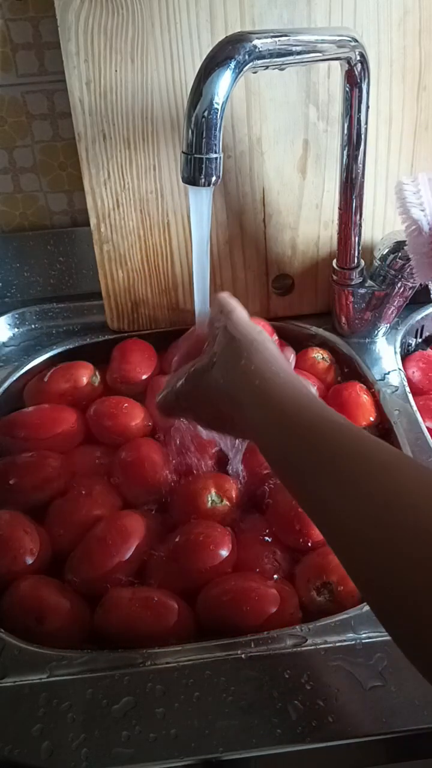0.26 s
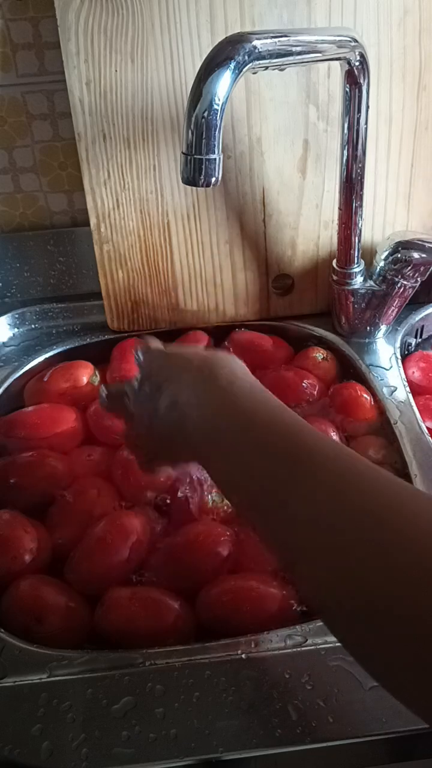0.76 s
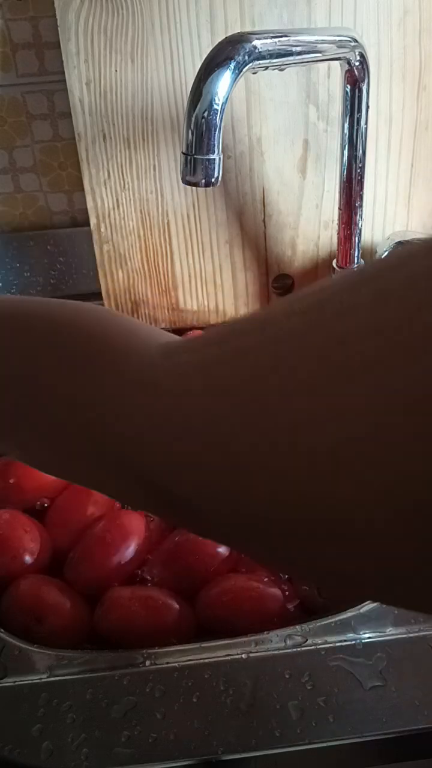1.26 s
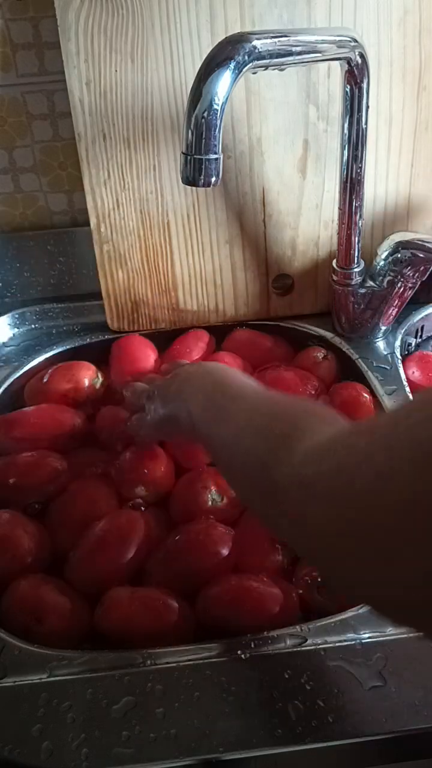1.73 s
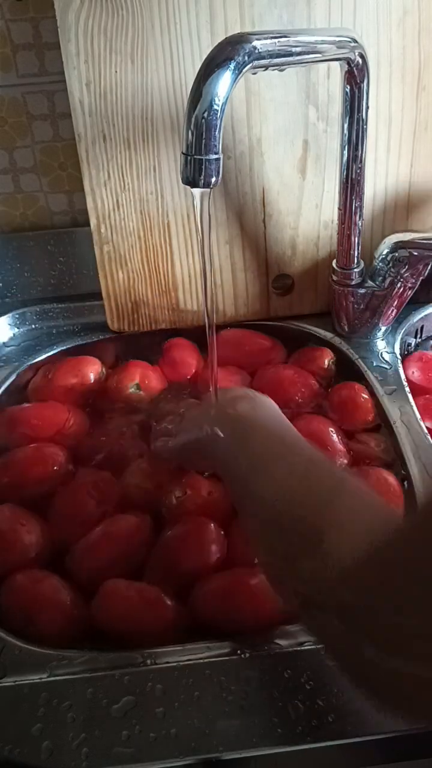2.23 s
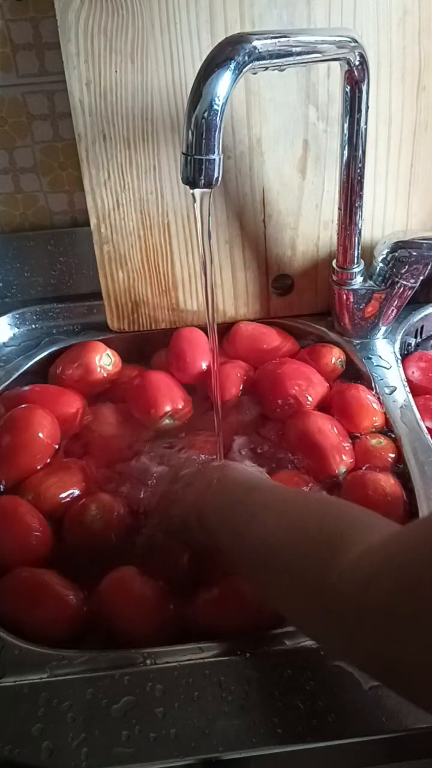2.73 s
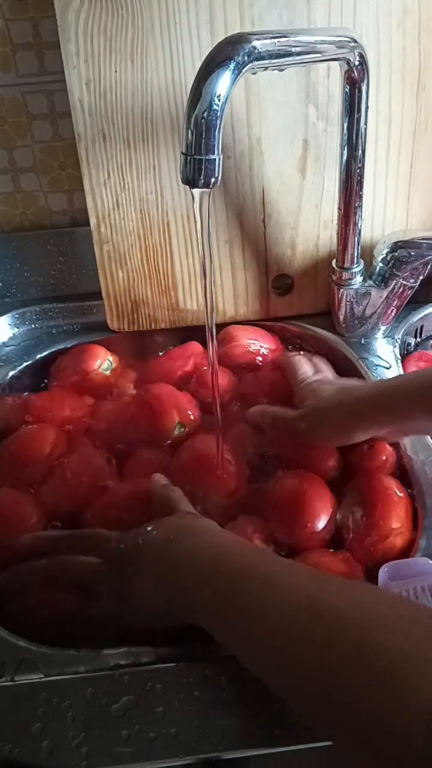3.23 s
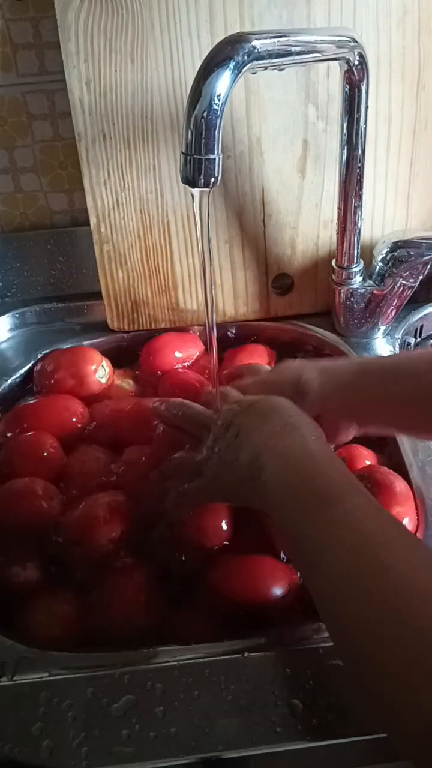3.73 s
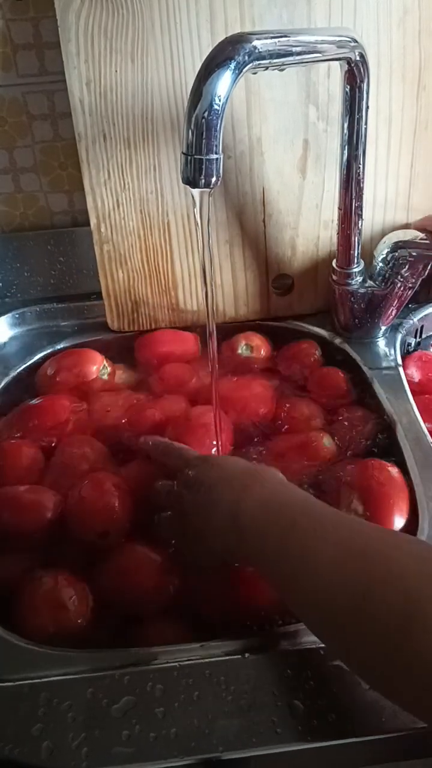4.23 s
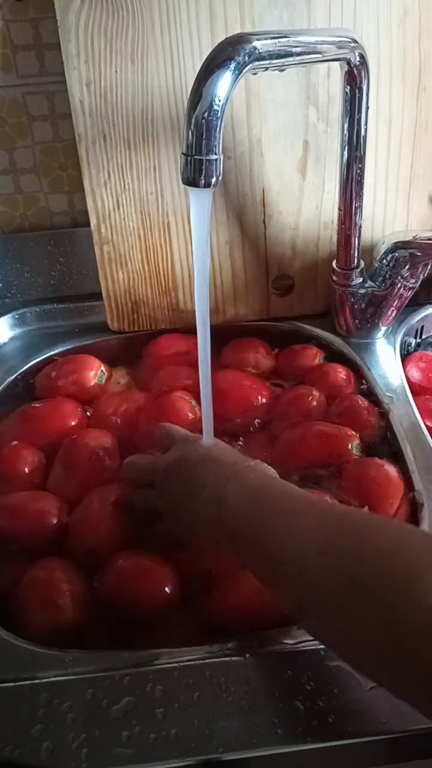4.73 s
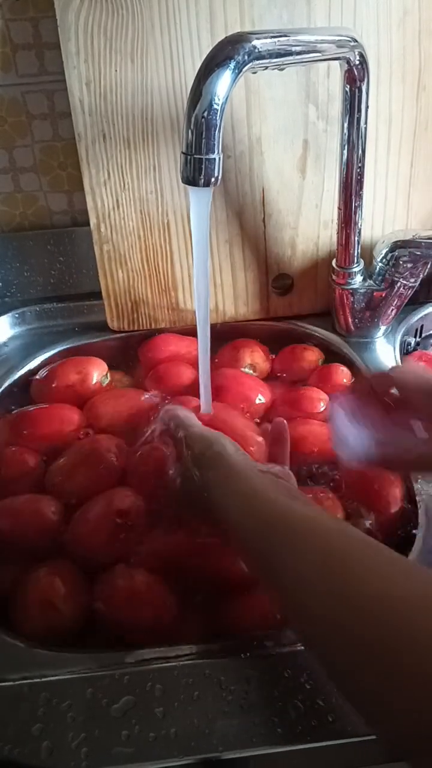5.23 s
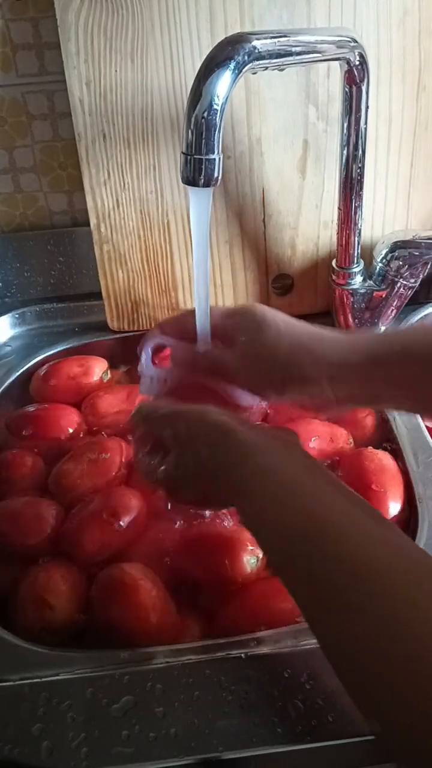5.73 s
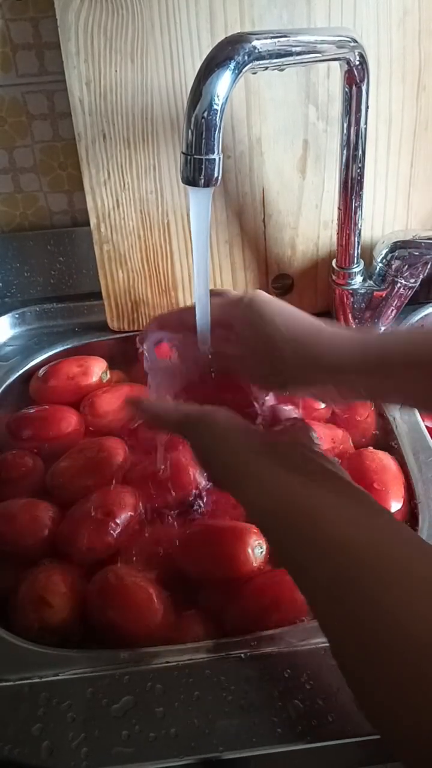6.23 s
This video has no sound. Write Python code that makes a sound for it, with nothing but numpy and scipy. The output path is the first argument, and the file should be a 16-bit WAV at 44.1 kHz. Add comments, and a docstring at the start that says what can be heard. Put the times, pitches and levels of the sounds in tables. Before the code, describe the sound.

Hands wash tomatoes in a steel sink: water stops, something clatters down heavily, then trickle, splashes, dull thuds and a hissing stream.

```python
"""In a tiled kitchen, hands wash tomatoes in a full steel sink under a tap that is shut and opened again.
Shaped noise and tiny bubbles make the stream and the valve's hiss; ringing bubbles make plops and glugs;
noise bursts make spray, drops and slaps. Fruit knocks on the steel, the cabinet booms at its resonance,
a load dumped nearby drives the draining board, and a small metal thing clinks in thin modes.
Decaying noise gives the echoes, and two small microphones colour the whole."""
import sys
import numpy as np
from scipy import signal
from scipy.io import wavfile
from scipy.ndimage import uniform_filter1d

SR = 44100
rng = np.random.default_rng(int(sys.argv[2]) if len(sys.argv) > 2 else 0)


def to_wav(s):
    """Save 16-bit WAV."""
    ch = np.atleast_2d(s).T  # columns
    pcm = np.round(np.clip(ch, -1, 1) * 32767)  # PCM
    wavfile.write(sys.argv[1], SR, pcm.astype(np.int16))


N = 285319

# strength of the running water: (time [s], fizz level [dB], low wash level [dB])
FLOW = [(0, -50.5, -64), (.65, -58.5, -66), (.86, -66.5, -68.5), (.92, -75, -75.5), (1.19, -80.5, -76.5),
        (1.23, -66.5, -56), (1.9, -73.5, -58.5), (2.1, -64.5, -62), (2.6, -67, -61.5), (3.2, -54, -58.5),
        (3.5, -65.5, -65), (4.1, -55.5, -62), (4.52, -69.5, -66), (4.59, -61, -65), (5.2, -56.5, -64.5),
        (5.7, -51, -63), (6.47, -53, -64)]
# resonances of the draining board: (frequency [Hz], width [Hz], relative level [dB])
BOARD = [(200, 21, -13.5), (217, 21, -4), (454, 31, -11.5), (570, 21, 2.5), (757, 54, -1.5),
         (878, 50, -5.5), (1096, 74, 0), (2300, 1660, -13)]
# response of the microphones: (frequency [Hz], gain [dB])
MIC = [(30, -1), (80, -2), (4300, 1), (5300, -7.5), (6500, -8), (7500, -2.5), (8500, -10), (9400, -7.5),
       (10500, -13), (15500, -9)]
SPATTER_S = 0.018  # decay time of the spatter after plops and glugs


def gain_of(db):
    """Level law: decibels become an amplitude factor."""
    return 10 ** (np.asarray(db) / 20)


def evened(x):
    """Power normalization: scales to rms 1."""
    return x / np.sqrt(np.mean(x ** 2) + 1e-20)


def read(points, hz):
    """Spectral interpolation: looks a curve up on a log-frequency axis."""
    f, value = np.transpose(points)
    return np.interp(np.log(hz + 1), np.log(f + 1), value)


def follow(rows, column=1):
    """Linear interpolation in time: one column of a curve at every sample."""
    return np.interp(np.arange(N) / SR, np.transpose(rows)[0], np.transpose(rows)[column])


def add(mix, s, sound, pan_db=0.):
    """Superposition at two microphones; the left one hears the sound two samples later."""
    start = round(s * SR)
    for side, at, db in ((0, start + 2, pan_db / 2), (1, start, -pan_db / 2)):
        wave = np.atleast_2d(sound)[-side]  # a single channel serves both sides
        part = mix[side, at:][:len(wave)]
        part += gain_of(db) * wave[:len(part)]


def resonate(x, hz, width):
    """Damped resonator: one complex pole, whose radius sets the width; gain 1."""
    r = np.exp(-np.pi * width / SR)
    return 2 * signal.lfilter([1 - r], [1, -r * np.exp(2j * np.pi * hz / SR)], x).real


def high(x, hz):
    """High-pass filtering: takes out the bass."""
    return signal.sosfilt(signal.butter(4, hz, "high", fs=SR, output="sos"), x)


def diffuse(length, size, level_db):
    """Diffuse field: noise shaped in frequency and time, with partial likeness between the channels."""
    # (frequency [Hz], left-right likeness [-1 to 1])
    likeness = [(180, 0.95), (550, 0.49), (1650, -0.17), (4970, 0.03), (15000, 0.25)]
    frames, hz = 4 * length // size + 5, np.fft.rfftfreq(size, 1 / SR)[:, None]
    a, b, c, d = rng.standard_normal((frames, len(hz), 4)).T
    same, left = np.clip(read(likeness, hz), -1, 1), a + 1j * b
    right = same * left + np.sqrt(1 - same ** 2) * (c + 1j * d)
    z = np.array([left, right])
    z = z * gain_of(level_db(hz, np.arange(frames) * size / 4 / SR))
    noise = signal.istft(z, nperseg=size, noverlap=size * 3 // 4)[1]
    return evened(noise[:, :length])


def bubble(hz, cycles, rise):
    """Bubble resonance: a decaying sine whose pitch climbs as the bubble nears the surface."""
    turns = np.arange(round(SR * 80 / hz)) * hz / SR
    tone = np.sin(2 * np.pi * turns * (1 + rise * turns))
    return tone * np.exp(-turns / cycles) * np.minimum(turns / 3.2, 1)


def puff(hz, width, length, rise):
    """Band-limited noise burst: fast rise, exponential decay, independent at each microphone."""
    t = np.arange(6000) / SR
    noise = resonate(resonate(rng.standard_normal((2, len(t))), hz, width), hz, width)
    return evened(noise) * np.exp(-t / length) * np.minimum(t / rise, 1)


def ring(modes):
    """Modal superposition: all modes (Hz, dB, t60 in s) are struck at once, then scaled to peak 1."""
    t = np.arange(round(.4 * SR)) / SR
    out = sum(gain_of(db - 60 * t / t60) * np.sin(2 * np.pi * hz * t) for hz, db, t60 in modes)
    return out / abs(out).max()


def swell(db, hz, length):
    """Modulated low resonance: an uneven tone swells and fades while its pitch sags."""
    wobble, sag_per_s = 0.39, 0.37  # share of unevenness; phase sag, so the pitch falls twice as fast
    t = np.arange(round(length * SR)) / SR
    slow = evened(uniform_filter1d(rng.standard_normal(SR // 2), size=900))
    uneven = 1 + wobble * slow[:len(t)]
    tone = np.sin(2 * np.pi * hz * t * (1 - sag_per_s * t))
    return gain_of(db) * uneven * tone * signal.windows.tukey(len(t), .6)


def stream():
    """Turbulence and bubble noise: patchy hiss and countless tiny bubbles over a low wash."""
    # spectra of fizz and low wash: (frequency [Hz], relative density [dB per Hz])
    fizz_colour = [(410, -48), (700, -16), (1620, -9.5), (2630, -2.5), (4050, 1), (5400, -16.5),
                   (7290, -7.5), (10500, -21.5), (16000, -23)]
    wash_colour = [(38, -19), (173, 2), (422, -2), (637, -7.5), (810, -8.5), (1950, -14), (3300, -120)]

    def patchy(hz, t):
        """Random modulation: the fizz colour with drifting patches."""
        luck = rng.standard_normal((len(t), len(hz))).T
        flicker = evened(uniform_filter1d(luck[0], size=5))  # all frequencies together
        patches = uniform_filter1d(uniform_filter1d(luck, size=8, axis=0), size=24, axis=1)
        return read(fizz_colour, hz) - read(MIC, hz) + 1.9 * flicker + 2.4 * evened(patches)

    hiss = diffuse(N, size=512, level_db=patchy)
    tiny = np.zeros((2, N))
    for hz in np.geomspace(1800, 9000, num=16):
        sizes = gain_of(2.3 * np.minimum(rng.exponential(1, (2, N)), 5))
        drops = sizes * (rng.random((2, N)) < 40 / SR)  # 40 per second on average
        notes = signal.oaconvolve(drops, bubble(hz, 8.9, 0.0061)[None])[:, :N]
        tiny += gain_of(read(fizz_colour, hz) - read(MIC, hz)) * notes
    wash = diffuse(N, size=2048, level_db=lambda hz, t: read(wash_colour, hz) + 0 * t)
    fizz = hiss + gain_of(-8.0) * evened(tiny)
    return gain_of(follow(FLOW)) * fizz + gain_of(follow(FLOW, column=2)) * wash


def valve():
    """Constriction noise: treble hiss with fuzzy whistles, clearer as the valve narrows."""
    # open, shut, opened to a trickle, then wide: (time [s], hiss level [dB])
    opening = [(0, -59), (.45, -56), (.92, -105), (1.9, -99), (2.1, -66.5), (4.53, -65.5), (4.59, -60),
               (5.7, -51.5)]
    # (frequency [Hz], width [Hz], relative strength [dB])
    whistles = [(5616.1, 67, 7), (7230, 140, 2.5), (9116.7, 280, 3), (13700, 100, -6.5)]
    pinch_db_per_db, pinch_most_db = 0.5, 7

    def colour(hz, t):
        """Resonant peaks on a noise floor: a treble plateau with narrow humps."""
        s, level_db = np.transpose(opening)
        drop_db = level_db.max() - np.interp(t, s, level_db)
        pinch_db = np.minimum(pinch_db_per_db * drop_db, pinch_most_db)
        humps = sum(gain_of(2 * (db + pinch_db)) * 30 / (1 + (2 * (hz - f) / w) ** 2)
                    for f, w, db in whistles)  # powers
        plateau = 1 + (6000 / (hz + 1)) ** 4
        return 10 * np.log10((1 + humps) / plateau) - 0.64 * read(MIC, hz)

    return gain_of(follow(opening)) * diffuse(N, size=1024, level_db=colour)


def cabinet():
    """Cavity resonance: low booms of the cabinet, from pushing hands and the dumped load, over a faint hum."""
    # booms from pushing hands and the dumped load: (time [s], level [dB], length [s])
    booms = [(0.439, -39.5, 0.15), (1.249, -44.5, 0.11), (1.368, -28, 0.055), (1.784, -50, 0.11),
             (1.974, -45.5, 0.075), (2.16, -44.5, 0.073), (2.648, -40.5, 0.15), (3.186, -54, 0.23),
             (3.962, -51, 0.086), (4.299, -54.5, 0.14)]
    cabinet_hz, hum_over_wash_db = 93.6, -7  # the water keeps the hollow faintly alive
    shudder_db, shudder_s = -13.5, 0.16  # rumble relative to the boom, and its decay time
    out, clock = np.zeros((2, N)), np.arange(N) / SR
    level = gain_of(follow(FLOW, column=2) + hum_over_wash_db)
    for s, db, length in booms:
        add(out, s, swell(db, cabinet_hz, length))
        age = clock - s
        shudder = np.exp(-abs(age) / shudder_s) * np.clip(age / length, 0, 1)
        level = level + gain_of(db + shudder_db) * shudder
    rumble = resonate(resonate(rng.standard_normal(N), cabinet_hz, 36), cabinet_hz, 36)
    return out + level * evened(rumble)


def plop(mix, s, db, hz):
    """Bubble entrainment: a main bubble rings, eight smaller sounds tumble after it, spatter flies."""
    spatter_db, spatter_width = -8, 0.68  # relative level; width as a share of the pitch
    main = bubble(hz, 2.8, 0.0041)
    add(mix, s, gain_of(db) * main / abs(main).max(), 8.0 * (rng.random() - .5))
    for late, size, soft, side in rng.random((8, 4)):
        small = bubble(hz * (0.76 + 1.096 * size), 4.3, 0.0069)
        small_db = db - 2.5 - 9.0 * late - 5.2 * soft
        add(mix, s + 0.041 * late, gain_of(small_db) * small, 3.3 * (side - .5))
    add(mix, s, gain_of(db + spatter_db) * puff(hz, spatter_width * hz, SPATTER_S, 0.0032))


def plops(mix):
    """Bubble resonance: clear plops at set times, small ones by chance as loud as the flow allows."""
    # (time [s], level [dB], pitch [Hz])
    clear = [(0.247, -39, 2120), (0.353, -37.5, 3260), (0.37, -42.5, 1790), (0.418, -37, 1850),
             (0.509, -36.5, 3230), (1.952, -38, 1394), (2.412, -39, 2060), (2.428, -40.5, 2530),
             (2.48, -35.5, 2026), (2.503, -34, 2190), (2.525, -32.5, 1820), (2.534, -30.5, 3430),
             (2.948, -36.5, 3500), (3.162, -32.5, 2800), (3.187, -30, 1544), (3.229, -27, 2190),
             (3.259, -29, 1404), (3.29, -32.5, 4540), (3.318, -33.5, 1680), (3.623, -32.5, 3800),
             (3.646, -32, 3520), (3.828, -48, 3470), (3.874, -48, 1520), (4.068, -46, 3393),
             (4.156, -35, 1486), (5.107, -42.5, 3700), (5.145, -33, 4100), (5.24, -44.5, 3030),
             (5.255, -45.5, 1690), (5.474, -37, 2870), (5.636, -37, 3280), (5.961, -36, 4840),
             (6.159, -36, 2230)]
    per_s, over_fizz_db, spread_db = 3, 9, 7  # chance plops lie up to the spread lower
    low_hz, octaves = 1506, 1.32
    for s, db, hz in clear:
        plop(mix, s, db, hz)
    fizz_db = follow(FLOW)
    for when, small, pitch in rng.random((round(per_s * N / SR), 3)):
        db = fizz_db[int(when * N)] + over_fizz_db - spread_db * small
        plop(mix, when * N / SR, db, low_hz * 2 ** (octaves * pitch))


def ticks(mix):
    """Impact noise: single drops land by chance in short wide-band bursts."""
    per_s, over_fizz_db, spread_db, tick_s = 14, 7.5, 2, 0.0012
    fizz_db = follow(FLOW)
    for when in rng.random(round(per_s * N / SR)):
        extra_db = spread_db * min(rng.exponential(1), 3)
        db = fizz_db[int(when * N)] + over_fizz_db + extra_db
        add(mix, when * N / SR, gain_of(db) * puff(5600, 9000, tick_s, 0.00008))


def spits(mix):
    """Spray noise: fine droplets hiss in a band above a lowest pitch."""
    # (time [s], level [dB], reach above the lowest pitch, before its limits [octaves])
    sprays = [(0.7394, -45.5, 1.15), (0.822, -52.5, 1.5), (1.936, -41.5, 1.555), (2.528, -41, 0.79),
              (2.566, -42.5, 1.1), (2.972, -20.5, 0.64), (3.144, -36, 0.77), (3.2314, -37.5, 1),
              (3.366, -45.5, 0.6622), (3.69, -46, 1.52), (3.874, -48, 1.4), (3.915, -44, 0.39),
              (4.031, -44, 0.98), (5.038, -41, 0.76), (5.47, -46.5, 0.6), (5.552, -40, 0.53),
              (5.949, -43.5, 0.67), (6.268, -42, 0.48)]
    low_hz, decay_s, rise_s = 5850, 0.025, 0.002
    for s, db, octaves in sprays:
        reach = 2 ** np.clip(octaves, .1, 1.3)
        spray = puff(low_hz * np.sqrt(reach), low_hz * (reach - 1), decay_s, rise_s)
        add(mix, s, gain_of(db) * high(spray, low_hz))


def dump():
    """Forced vibration: a dense rattle of impacts drives the resonances of the board."""
    # a load is dragged, then dumped: (time [s], force [dB], rise [s], fading [dB per s], length [s])
    loads = [(1.192, -64.5, 0.027, -2, 0.51), (1.365, -17.5, 0.011, 234, 0.17)]
    bright_db, dulling_db_per_s = -3, 27.5  # tilt per octave; the rattle dulls as it settles
    drive, clock = np.zeros(N), np.arange(N) / SR
    for s, force_db, rise, fading_db, length in loads:
        rattle = rng.standard_normal(N) * gain_of(4.706 * rng.exponential(1, N))
        hz, t, z = signal.stft(rattle, SR, nperseg=256)
        octaves = np.log2(np.maximum(hz, 150) / 300)[:, None]
        tilt_db = bright_db - dulling_db_per_s * np.clip(t - s, 0, length)
        tilted = signal.istft(z * gain_of(octaves * tilt_db), SR, nperseg=256)[1][:N]
        age = clock - s
        fade = gain_of(force_db - fading_db * np.clip(age, 0, length))
        drive += np.clip(age / rise, 0, 1) ** 2 * fade * (age < length) * tilted
    board = sum(gain_of(db) * resonate(drive, f, w) for f, w, db in BOARD)
    return 0.5 * drive + 2.28 * board


def board_hum():
    """Fundamental resonance: drag and drop set the lowest board resonance humming."""
    # (time [s], level [dB], length [s])
    hums = [(1.217, -42, 0.088), (1.375, -26.5, 0.068)]
    out = np.zeros((2, N))
    for s, db, length in hums:
        add(out, s, swell(db, BOARD[0][0], length))
    return out


def clink(mix):
    """Modal ringing: small metal, struck a glancing blow, builds up and rings with uneven, rough loudness."""
    # (time [s], level [dB])
    strikes = [(1.8136, -25)]
    # (frequency [Hz], relative level [dB], t60 [s])
    metal = [(2417.1, -4.5, 0.11), (2490.6, -6, 0.11), (3060, -1.5, 0.15), (3680, -16, 0.11),
             (4040, -4, 0.24), (7100, -5, 0.043), (8680, -2, 0.05), (11830, 3.5, 0.1)]
    for s, db in strikes:
        tone = high(ring(metal), 880)
        slow = uniform_filter1d(rng.standard_normal(len(tone)), size=150)
        uneven = 1 + 0.34 * evened(slow)
        build_up = np.clip(np.arange(len(tone)) / SR / 0.009466, .12, 1)
        add(mix, s, gain_of(db) * tone * uneven * build_up)


def knocks(mix):
    """Impact excitation: fruit thuds dully on the damped basin, with a crack and splash at the same moment."""
    # (time [s], level [dB], thud [Hz], rumble decay [s],
    #  relative basin level [dB], relative crack level [dB])
    hits = [(1.939, -23, 550, 0.0064, -6.5, -43), (2.144, -39, 377, 0.01, -20, -22),
            (2.566, -31, 660, 0.012, 0, -1), (2.745, -22, 742, 0.017, -8.5, -38),
            (2.973, -15.5, 627, 0.033, -26, 7.5), (3.264, -34, 427, 0.023, -28, -4),
            (3.749, -39, 823, 0.011, -2.5, -18), (4.161, -46, 713, 0.023, 7, -8),
            (5.012, -25.5, 638, .017, -2.5, -5)]
    # the water-filled basin, heavily damped: (frequency [Hz], relative level [dB])
    basin_modes = [(1335, 2), (1720, -2.5), (2070, -1.5)]
    basin_width_hz, basin_s = 220, 0.013
    for s, db, hz, length, basin_db, crack_db in hits:
        swing = ring([(hz, 0, .016)])[:6000]
        rumble = resonate(puff(hz, 380, length, 0.0049)[0], hz, 340)
        add(mix, s, gain_of(db) * high(swing + 0.67 * rumble, 358))

        basin = 0.25 * sum(gain_of(mode_db) * puff(f, basin_width_hz, basin_s, 0.00086)[0]
                           for f, mode_db in basin_modes)
        rough = 0.28 * puff(1470, 1800, 0.014, 0.0014)
        add(mix, s, gain_of(db + basin_db) * high(basin + rough, 560))

        crack = high(ring([(3700, -0.5, 0.01), (4300, 0.5, 0.003)]), 600)
        add(mix, s, gain_of(db + crack_db + 3.5) * crack)

        # the splash breaks into clumps
        lumps_db = 3.6 * evened(uniform_filter1d(rng.standard_normal(6000), size=200))
        splash = high(puff(2970, 3700, 0.058, 0.0018), 1600)
        add(mix, s, gain_of(db + crack_db - 14.5 + lumps_db) * splash)


def snaps(mix):
    """Impact transient: drops slap wet skin in very short, dry noise bursts."""
    # (time [s], level [dB])
    drops = [(2.016, -33), (3.646, -33), (3.75, -43.5), (3.957, -33), (5.348, -46), (5.472, -46)]
    for s, db in drops:
        add(mix, s, gain_of(db) * high(puff(2500, 2000, 0.0018, .0002), 1540))


def glugs(mix):
    """Frequency modulation: larger bubbles sound ragged sliding notes, with spatter from midway."""
    # (time [s], level [dB], first pitch [Hz], last pitch [Hz])
    slides = [(2.918, -37.5, 1990, 2870), (3.13, -38.5, 1430, 1990), (3.619, -40.5, 2145, 1550),
              (3.91, -45, 2170, 2970), (4.029, -47, 2330, 2600), (4.133, -45.5, 1870, 2300)]
    glug_s, raggedness, spatter_db = .02, 0.42, -2.5
    for s, db, first_hz, last_hz in slides:
        hz = np.geomspace(first_hz, last_hz, round(glug_s * SR))
        rough = evened(uniform_filter1d(rng.standard_normal(SR // 2), size=60))
        ragged = 1 + raggedness * rough[:len(hz)]
        note = np.sin(2 * np.pi * np.cumsum(hz) / SR) * np.hanning(len(hz))
        add(mix, s, gain_of(db) * ragged * note)
        spatter = puff(last_hz, last_hz / 2, SPATTER_S, .004)
        add(mix, s + glug_s / 2, gain_of(db + spatter_db) * spatter)


def kitchen(x):
    """Reverberation: three decaying tails take turns, so that like sounds get unlike echoes."""
    # (frequency [Hz], t60 [s])
    decay = [(100, 0.35), (700, 0.34), (2000, 0.37), (5000, 0.31), (13000, 0.23)]
    out, turn = np.zeros((2, N)), np.arange(N) / SR * 5.0
    for k in range(3):
        tail = diffuse(SR * 3 // 4, size=256, level_db=lambda hz, t: -60 * t / read(decay, hz))
        tail = tail * np.clip(np.arange(tail.shape[1]) / SR / 0.001, 0, 1)
        share = np.sqrt(2 / 3) * np.cos(np.pi * (turn + k / 3))  # the squares sum to 1
        echo = signal.fftconvolve((x * share)[None], tail / np.linalg.norm(tail[0]), axes=1)
        out += echo[:, :N]
    return out


def scene():
    """Superposition: near sounds and their echoes over the stream, valve and low hums."""
    wet, hard = np.zeros((2, N)), np.zeros((2, N))
    for splash in (plops, ticks, spits, snaps, glugs):
        splash(wet)
    for blow in (clink, knocks):
        blow(hard)
    load = high(dump(), 60.95)
    send = gain_of(-3.5) * wet.mean(0) + gain_of(-3.0) * hard.mean(0) + gain_of(8.0) * load
    near = wet + hard + 0.93 * load
    return near + kitchen(send) + stream() + valve() + cabinet() + board_hum()


def record(dry):
    """Minimum-phase filtering: the colour of two small microphones, then the band limit."""
    # (frequency [Hz], left over right [dB])
    lean = [(60, 3), (1500, 0.5), (4000, 4.5), (8000, 4), (15000, -1.5)]
    edge_hz = 15850
    hz = abs(np.fft.fftfreq(8192, 1 / SR))
    sides = np.array([[.5], [-.5]])
    log_gain = np.log(gain_of(read(MIC, hz) + sides * read(lean, hz)))
    # the Hilbert transform of the log gain gives the phase of a causal filter
    colour = np.fft.ifft(np.exp(np.conj(signal.hilbert(log_gain)))).real[:, :2048]
    heard = signal.oaconvolve(dry, colour, axes=1)[:, :N]
    band = signal.firwin(511, edge_hz, window=("kaiser", 9), fs=SR)
    return signal.oaconvolve(heard, band[None], "same")


dry = scene()
out = record(dry)
to_wav(out)
```